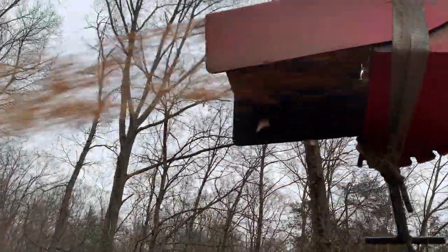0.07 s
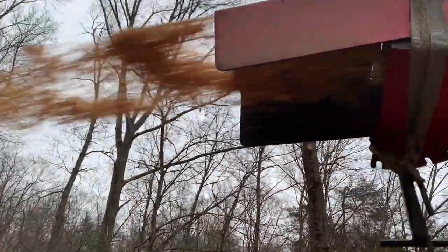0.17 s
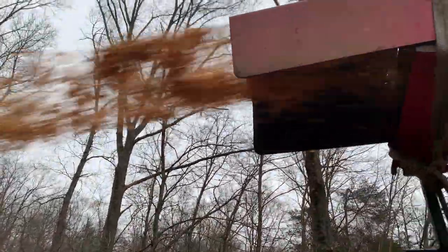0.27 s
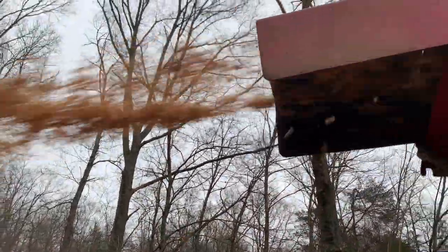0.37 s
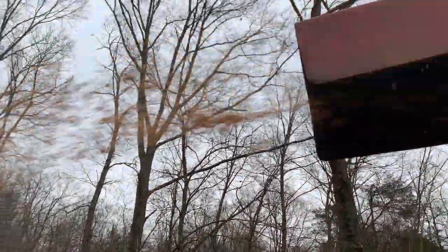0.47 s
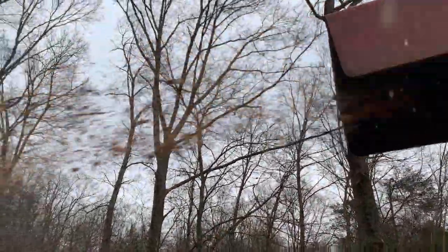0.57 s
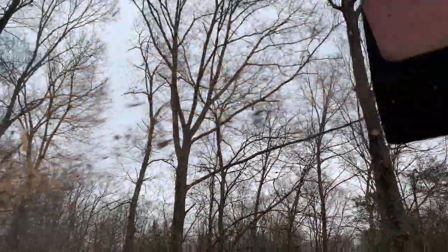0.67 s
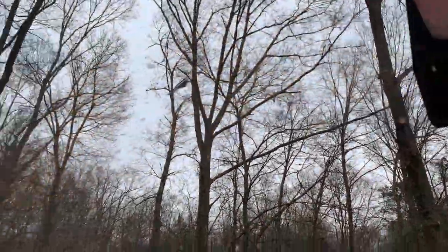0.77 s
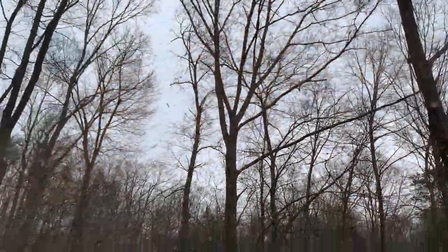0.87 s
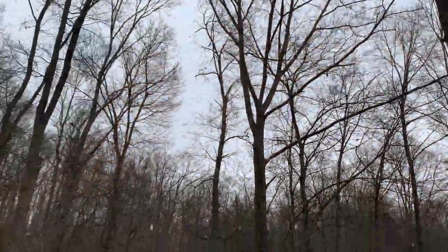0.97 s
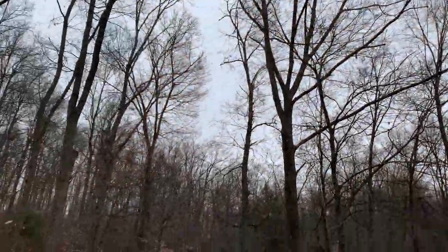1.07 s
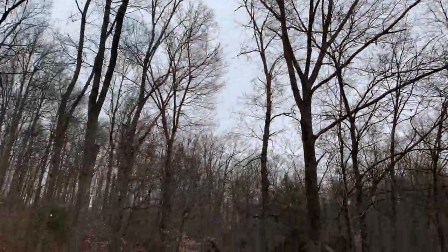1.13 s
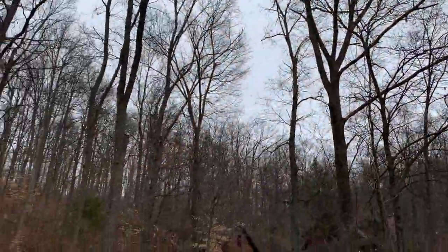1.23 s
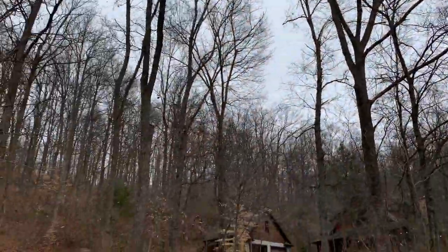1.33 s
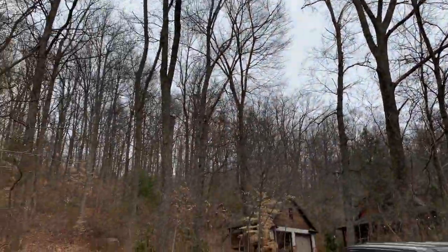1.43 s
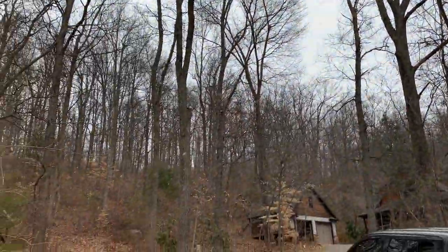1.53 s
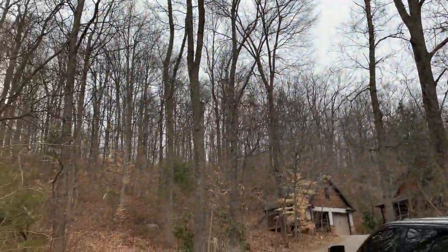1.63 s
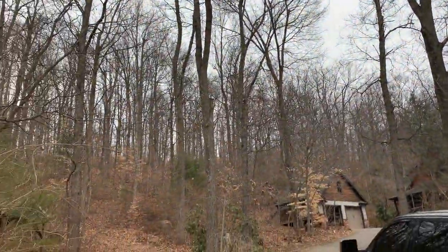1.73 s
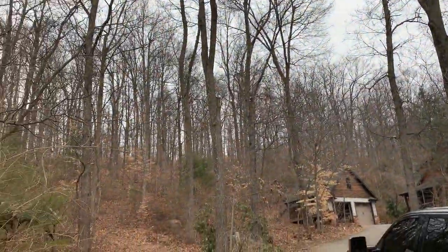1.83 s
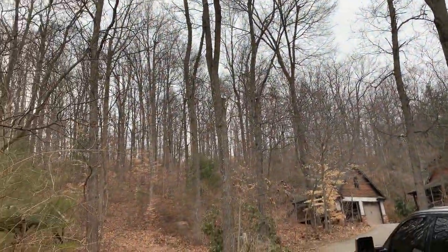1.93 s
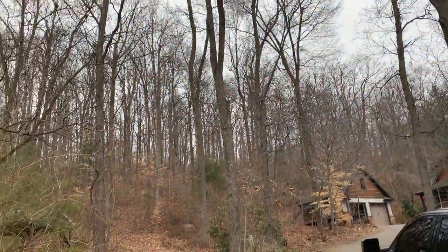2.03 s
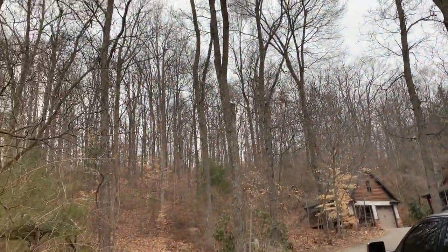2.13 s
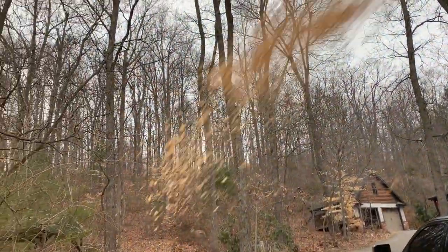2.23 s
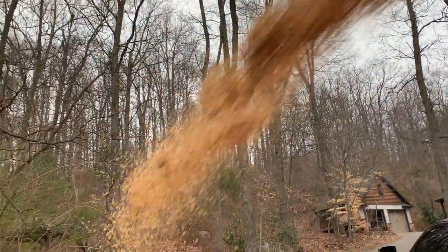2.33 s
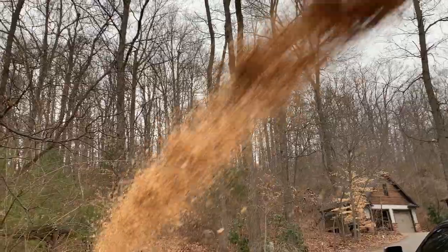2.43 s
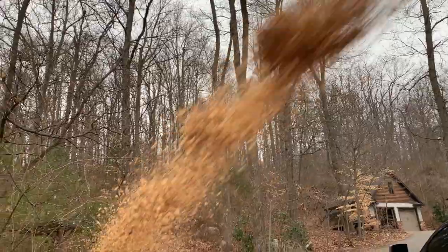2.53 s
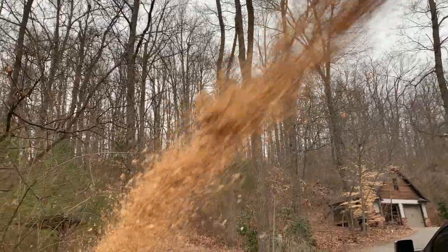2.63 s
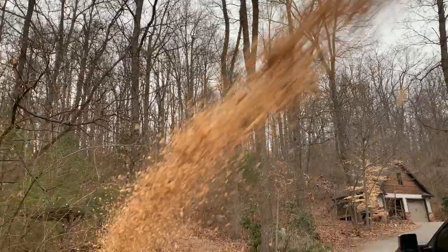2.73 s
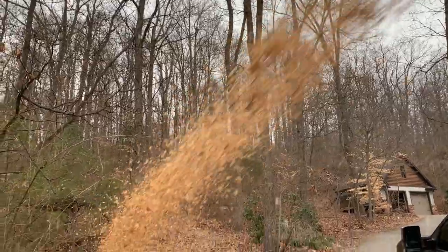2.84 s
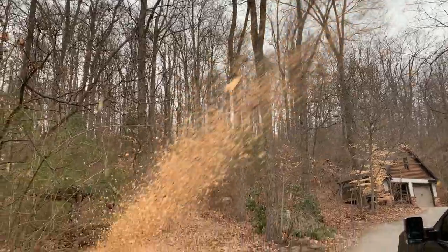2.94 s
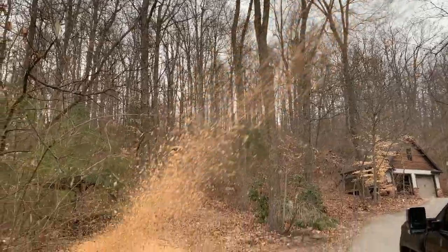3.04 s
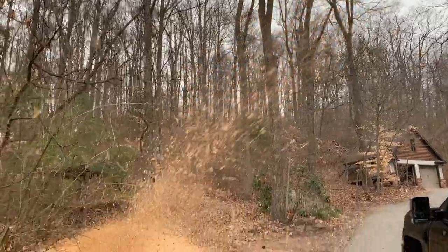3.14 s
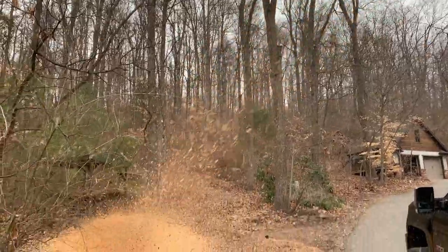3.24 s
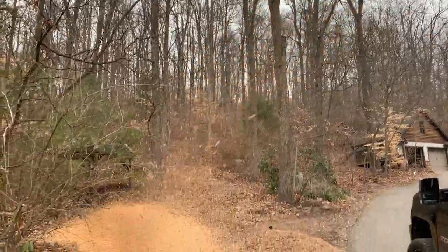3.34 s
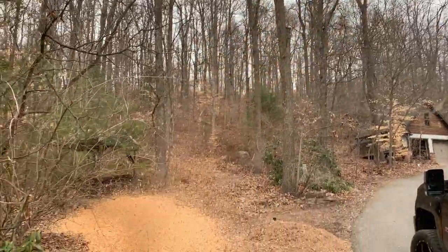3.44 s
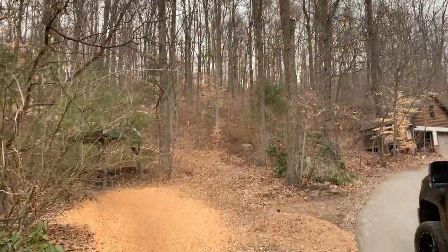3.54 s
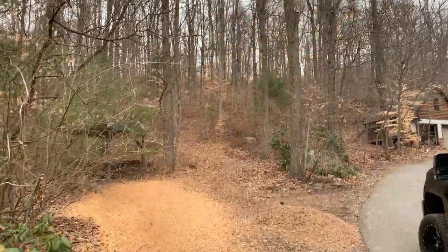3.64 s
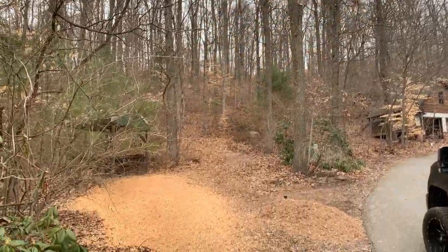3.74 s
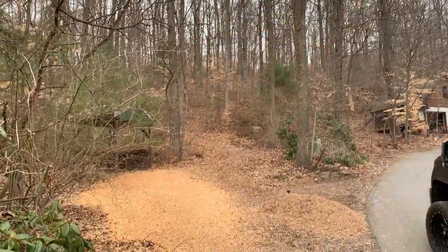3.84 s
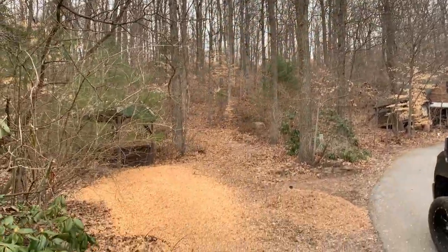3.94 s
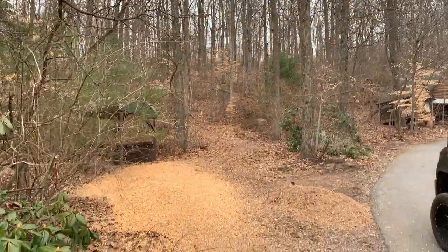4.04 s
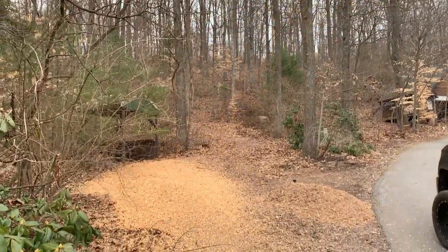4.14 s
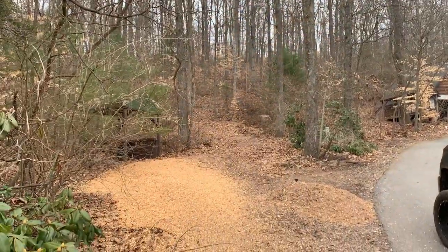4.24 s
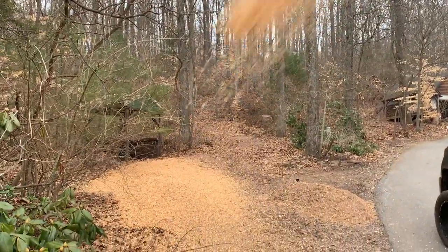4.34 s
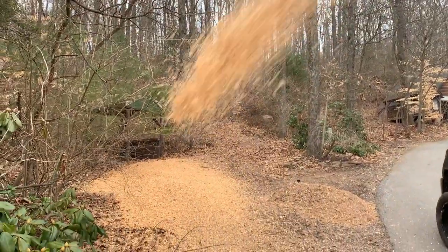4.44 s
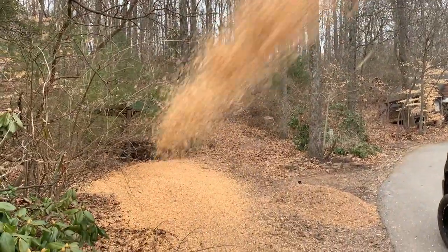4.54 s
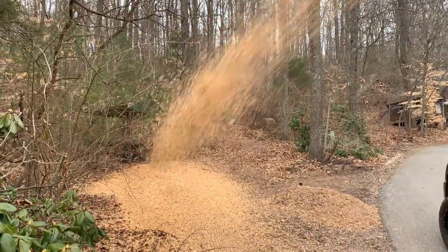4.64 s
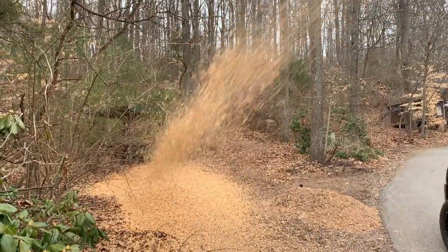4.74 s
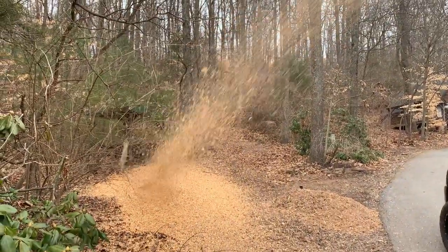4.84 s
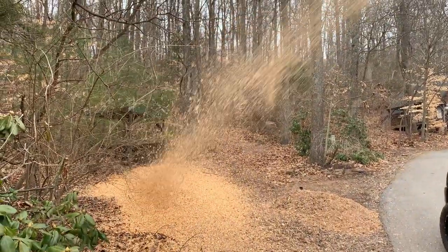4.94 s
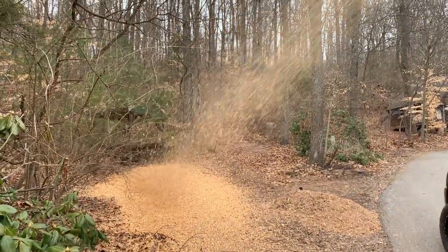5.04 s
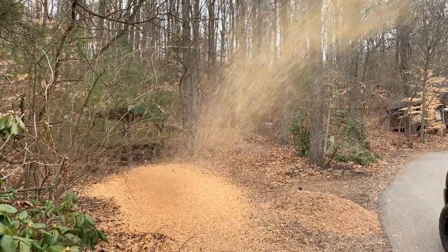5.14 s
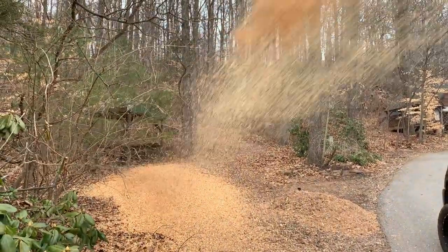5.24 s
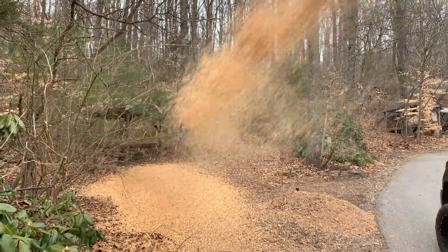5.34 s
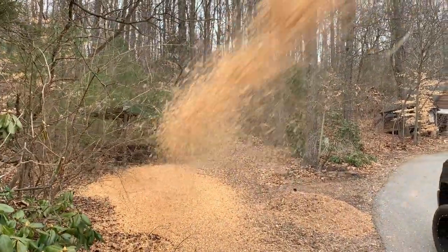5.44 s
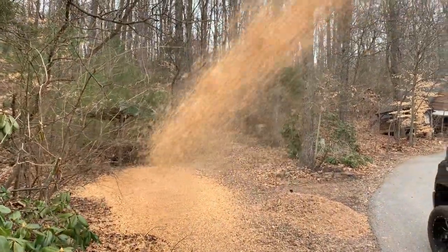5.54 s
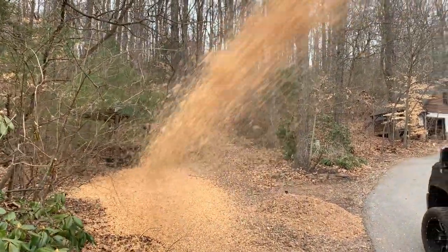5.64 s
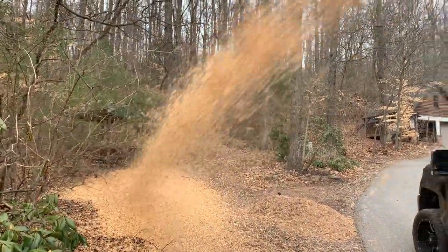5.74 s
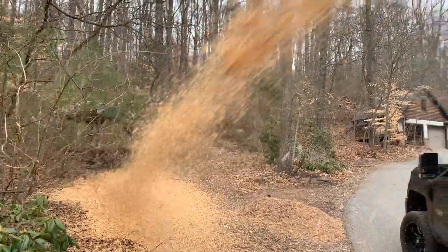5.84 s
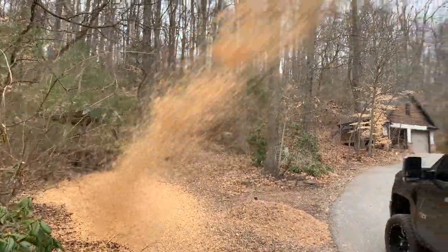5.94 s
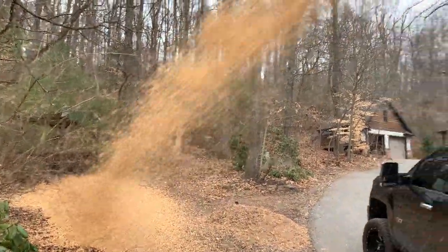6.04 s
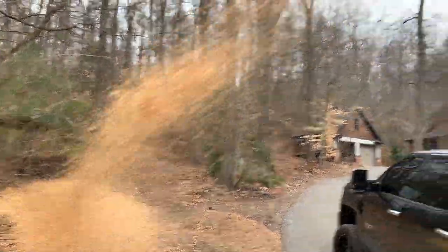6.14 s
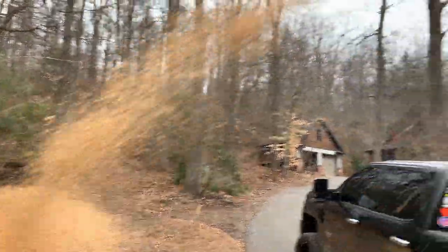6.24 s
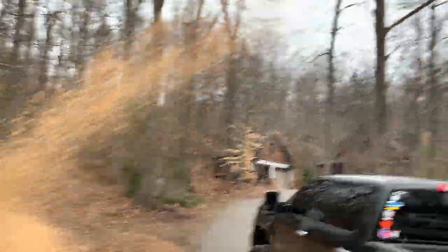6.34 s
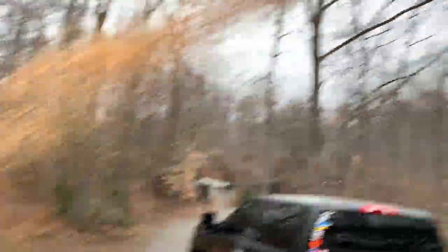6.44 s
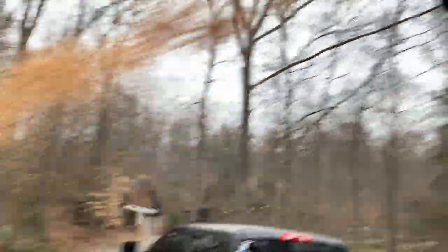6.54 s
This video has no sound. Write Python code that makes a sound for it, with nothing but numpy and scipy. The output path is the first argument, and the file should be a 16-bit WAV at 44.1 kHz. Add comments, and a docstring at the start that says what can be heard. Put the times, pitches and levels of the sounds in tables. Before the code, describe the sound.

A low diesel hum and a spinning knife drum beat against each other under a steady rush of cooling air. Wood chips rattle, thud and ring through a steel chute in bursts, with bright spray on top. Each feed makes the motor sag; pauses let it rise. The last feeds crowd together, roughest past the five-second mark. Close, open-air phone pickup.

```python
"""A towed wood chipper at a forest edge, its diesel exhaust and belt-driven knife drum humming a few hertz apart.
At 0 s chipping is under way: the chute roars, sprays and knocks; the hum sags, then climbs to 2 s as dust fades.
From 2.0 s a new surge pulls the speed down again; it recovers by 4.1 s, the two hums beating throughout.
Surges then follow closely, roaring near 5.3 s; the speed dips, recovers briefly to 5.06 s, then falls to the end.
Tones are summed sines, fan and chips shaped noise, knocks decaying sines; a phone hears it at two spaced ports."""
import sys
import numpy as np
from scipy import signal
from scipy.fft import rfft, irfft, next_fast_len
from scipy.io import wavfile
from scipy.ndimage import uniform_filter1d, map_coordinates

SR = 44100
rng = np.random.default_rng(int(sys.argv[2]) if len(sys.argv) > 2 else 0)


def wav_out(sig):
    """Save sig, one row per channel (or a flat mono array), as 16-bit PCM at SR to the path in sys.argv[1]."""
    wavfile.write(sys.argv[1], SR, np.round(np.clip(np.atleast_2d(sig).T, -1, 1) * 32767).astype(np.int16))


N = 291060


def amp(db):
    """Gain of a level in dB."""
    return 10 ** (np.asarray(db) / 20)


def unit(x):
    """x at rms 1."""
    return x / np.sqrt(np.mean(x ** 2) + 1e-20)


def along(points, hz):
    """Interpolate (Hz, value) points on a log frequency axis."""
    f, v = np.transpose(points)
    return np.interp(np.log(hz + 1), np.log(f + 1), v)


def curves(rows):
    """One value per sample for each column after the time."""
    s, *cols = np.transpose(rows)
    return [np.interp(np.arange(N) / SR, s, c) for c in cols]


def wobble(rate_hz):
    """Smooth random curve with rate_hz knots per second."""
    knots = rng.standard_normal(int(N * rate_hz / SR) + 4)
    return map_coordinates(knots, [np.arange(N) * rate_hz / SR])


def filtered(x, response):
    """x times a complex response of frequency."""
    m = next_fast_len(N + SR // 2)
    return irfft(rfft(x, m) * response(np.fft.rfftfreq(m, 1 / SR)), m)[..., :N]


# Steel chute resonances: (frequency [Hz], width [Hz], peak gain at resonant=1 [dB])
CHUTE_MODES = [(199.6, 43, 5.5), (317, 82, 3.5), (423, 35, 4.5), (486, 13, 2), (533, 48, 2), (630, 67, 2),
               (854, 27, 4), (993, 23, 2.5), (1376, 19, 7), (1670, 760, 4), (2080, 9.9, -8), (2690, 34, -3),
               (3440, 55, -2.5)]


def chute_db(hz):
    """Resonant gain of the chute: a sum of bell-shaped peaks in dB."""
    return sum(db / (1 + (2 * (hz - centre) / width) ** 2) for centre, width, db in CHUTE_MODES)


def rush(spectrum, patchy_db, resonant):
    """Two unrelated noises at rms 1 with shared time-frequency patches of gain; resonant scales the chute peaks."""
    z = signal.stft(rng.standard_normal((2, N)), nperseg=512)[2]
    field = rng.standard_normal(z.shape[1:])
    field = uniform_filter1d(uniform_filter1d(field, 6, 0), 8, 1)
    pair = signal.istft(z * amp(patchy_db * unit(field)), nperseg=512)[1][:, :N]
    return unit(filtered(pair, lambda hz: amp(along(spectrum, hz) + resonant * chute_db(hz))))


def grains(per_second, spread_db, life_s):
    """Rms-1 envelope of decaying impacts, dB sizes exponentially spread: upward, or downward if spread_db < 0."""
    draws = rng.random((round(per_second * N / SR), 2))
    sizes = amp(-spread_db * np.log(1 - draws[:, 1]))
    hits = np.bincount((draws[:, 0] * N).astype(int), sizes, N)
    # the second lap starts with the tails of the first
    laps = signal.lfilter([1], [1, -np.exp(-1 / (life_s * SR))], np.tile(hits, reps=2))
    return unit(laps[N:])


# Cooling air spectrum: (frequency [Hz], relative density [dB per Hz])
FAN_SPECTRUM = [(30, -28), (50, -19), (65, -6), (120, -8.5), (200, -3), (350, -8.5), (600, -10.5),
                (1000, -15), (2000, -21), (4000, -34), (8000, -40), (12400, -36), (13200, -50),
                (15700, -50)]


def cooling_fan():
    """Broadband rush of cooling air, slowly wavering, faintly coloured by the chute."""
    return amp(-35 + .8 * wobble(3)) * rush(FAN_SPECTRUM, patchy_db=1, resonant=.15)


# Fine dust drifting past the phone: (time [s], level [dB])
DUST_LEVEL = [(0, -55), (.4, -48), (.8, -47), (1.05, -47), (1.4, -52.5), (1.65, -63), (2.3, -78)]
# Ticks and puffs of spray close to the phone: (time [s], level before attack and noise [dB])
TICKS_AND_PUFFS = [(0.492, -29), (0.8494, -40), (0.9594, -45), (1.0794, -36), (1.1034, -33), (1.1398, -33),
                   (1.1644, -40), (1.3433, -40), (1.3694, -49), (1.6826, -37), (1.7644, -41), (2.8694, -35),
                   (3.0594, -41), (3.5294, -38), (3.5494, -39)]
# Spectrum of close dust, ticks and puffs: (frequency [Hz], relative density [dB per Hz])
PATTER_SPECTRUM = [(3000, -26), (5500, -8), (9000, -4), (12400, 0), (13200, -12), (15700, -13)]
TICK_T60_S, TICK_ATTACK_S = 0.065, .004


def dust_and_ticks():
    """Dust as dense impacts, ticks and puffs as single decays, all gating one treble noise."""
    ticks, t = np.zeros(N + SR), np.arange(SR // 3) / SR
    for s, db in TICKS_AND_PUFFS:
        ticks[round(s * SR):][:len(t)] += amp(db - 60 * t / TICK_T60_S) * (1 - np.exp(-t / TICK_ATTACK_S))
    dust = amp(curves(DUST_LEVEL)[0]) * grains(2500, spread_db=1.6, life_s=.006)
    return (ticks[:N] + dust) * rush(PATTER_SPECTRUM, patchy_db=2, resonant=0)


# Knocks and short chute rings, thickening into a roar near 5.3 s:
# (time [s], level before attack and roughness [dB], frequency [Hz], t60 [s])
KNOCKS_AND_RINGS = [(0.025, -13, 202, .15), (0.19, -14.5, 450.4, .25), (0.25, -10, 466, 0.16),
                    (2.142, -12, 490, 0.42), (2.212, -7.5, 288, 0.12), (2.31, -11, 196, 0.1),
                    (2.432, -10, 460, 0.091), (2.533, -9.5, 193, 0.14), (2.618, -19, 307, .08),
                    (4.152, -6.5, 293, 0.084), (4.19, -12, 429, 0.28), (4.425, -10, 295, 0.11),
                    (5.12, -5, 428, 0.063), (5.187, -9, 194, 0.11), (5.245, -8, 587, .12),
                    (5.275, -3.5, 427, 0.079), (5.3, -11, 658, 0.19), (5.345, -11, 513, 0.13),
                    (5.43, -3, 438, 0.076), (5.445, -8, 598, 0.089), (5.744, -13, 436, 0.12),
                    (5.823, -14, 198, 0.085), (6.228, -11.5, 193, 0.08), (6.295, -4.5, 203, 0.07),
                    (6.432, -6, 408, 0.12), (6.5, -16.5, 425, 0.36)]
KNOCK_ATTACK_S, KNOCK_ROUGH_DB = 0.0091, 3


def chute_knocks():
    """Knocks and short chute rings as decaying sines, unevenly damped by the chip stream."""
    knocks, t = np.zeros(N + SR), np.arange(SR // 3) / SR
    for s, db, hz, t60_s in KNOCKS_AND_RINGS:
        envelope = amp(db - 60 * t / t60_s) * (1 - np.exp(-t / KNOCK_ATTACK_S))
        knocks[round(s * SR):][:len(t)] += envelope * np.sin(2 * np.pi * hz * t)
    return amp(KNOCK_ROUGH_DB * wobble(45)) * knocks[:N]


# Exhaust tones: (multiple of firing rate [-], relative level [dB])
EXHAUST_TONES = [(1, 0), (1.5, -19), (2, 0), (2.5, -10), (3, 0), (3.5, -15), (4, -6), (4.5, -15), (5, -8.5),
                 (5.5, -20), (6, -8), (6.5, -19), (7, -12), (8, -12), (8.5, -19), (9, -23), (9.5, -20),
                 (10, -15)]
UNEVEN_FREE_DB, UNEVEN_LOADED_DB = -2, 10.5  # added to the halfway tones


def exhaust(firing, load, upper_db):
    """Firing-rate harmonics plus halfway tones from unequal cylinders; high or loaded tones flutter more."""
    uneven_db = UNEVEN_FREE_DB + (UNEVEN_LOADED_DB - UNEVEN_FREE_DB) * load
    tones = 0
    for k, db in EXHAUST_TONES:
        level_db = db + (k % 1 > 0) * uneven_db + (k > 3) * upper_db
        flutter_db = (.12 * k + .08 * uneven_db) * wobble(6)
        # high tones leave the pipe later; above the fourth, an extra half-turn lag per multiple
        lag_rad = .14 * k * (k - 1) + np.pi * max(k - 4, 0)
        tones = tones + amp(level_db + flutter_db) * np.sin(2 * np.pi * k * firing - lag_rad)
    return tones


# Drum tones: (multiple of drum pulse rate [-], relative level [dB], phase offset [turns])
DRUM_TONES = [(1, -0.5, 0), (2, -3, 0.084), (3, -29, 0.021), (4, -14, 0.11), (5, -15, 0.00013)]


def knife_drum(turning):
    """Drum harmonics in opposite sign, so the fundamental opposes the exhaust's at whole turns gained."""
    return sum(-amp(db) * np.sin(2 * np.pi * (k * turning + offset)) for k, db, offset in DRUM_TONES)


# Firing rate: (time [s], rate before jitter [Hz])
FIRING_RATE = [(0, 67), (.37, 61), (.5, 61.8), (.85, 65.5), (1.2, 68.3), (1.6, 70.8), (2.08, 73.1),
               (2.3, 66), (2.6, 58.5), (2.75, 57.3), (3.1, 59.6), (4.05, 68), (4.13, 68.4), (4.3, 63.5),
               (4.5, 60.3), (5.06, 63.5), (5.55, 51), (5.8, 47.8), (6.6, 44.5)]
# Drum phase gained on the firing phase: (time [s], gain [turns])
DRUM_GAINED = [(0, -1.15), (1.742, 7), (2.115, 9), (2.29, 10), (2.49, 11), (2.768, 12), (3.275, 14),
               (4.133, 18), (4.6, 20), (5.218, 23), (6.6, 29)]
# Running free: (time [s], engine level [dB], drum level [dB], lift of exhaust tones above the third [dB])
FREE_RUNNING = [(0, -29, -32, 0), (.45, -34, -31.5, 0), (.85, -32, -32.5, 1), (1.2, -30, -36.5, 2),
                (1.7, -29.5, -34, 3), (2.1, -27, -32, 0), (2.22, -24, -33, -4), (2.3, -34, -33, 0),
                (2.75, -34, -31.5, 0), (3.3, -32.5, -31, 2), (3.7, -30.5, -33, 2.5), (3.9, -29.5, -33.5, 4),
                (4.1, -28.5, -34.5, 2), (4.5, -32.5, -30, 0), (5.06, -35, -29.5, 0), (5.6, -32, -40, 0),
                (6.6, -32, -42, 0)]
# Colour of both hums: (frequency [Hz], gain [dB])
HOUSING_COLOUR = [(30, -20), (45, -5), (60, -2), (69, 1), (73, 8), (77, 1), (100, -2), (134, 3), (147, 1),
                  (155, -5), (178, 4), (195, 2), (218, -4), (270, 2.5), (295, -1), (322, -3), (336, 6),
                  (345, -2), (365, -4), (405, 2), (432, -6), (460, -7), (505, 5), (530, -4), (575, 6),
                  (605, -2), (640, -2), (668, 2), (700, 6.5), (900, 0)]
ENGINE_LOADED_DB, DRUM_LOADED_DB = -3, -0.5  # level changes at full load
FULL_LOAD_DB, LOAD_RANGE_DB = -18.5, 27.5  # rattle at full load; span down to no load


def hum(rattle_gain):
    """Exhaust and drum beat together, load shifting their levels; also returns the drum phase [turns]."""
    load = np.clip(1 + (20 * np.log10(rattle_gain) - FULL_LOAD_DB) / LOAD_RANGE_DB, 0, 1)
    load = uniform_filter1d(load, size=SR // 8)
    engine_db, drum_db, upper_db = curves(FREE_RUNNING)
    firing = np.cumsum(curves(FIRING_RATE)[0] * (1 + .001 * wobble(12))) / SR
    turning = firing + curves(DRUM_GAINED)[0]
    tones = amp(engine_db + ENGINE_LOADED_DB * load) * exhaust(firing, load, upper_db)
    tones = tones + amp(drum_db + DRUM_LOADED_DB * load) * knife_drum(turning)
    return filtered(tones, lambda hz: amp(along(HOUSING_COLOUR, hz))), turning


# Leftover chips between surges: (time [s], rattle [dB], thuds over rattle [dB], spray [dB])
LEFTOVERS = [(0, -40, 6, -38.5), (.4, -40.5, 11.5, -39), (.75, -48, 7, -43), (1.4, -48, 10, -58),
             (2.05, -45.5, 11.5, -61), (2.75, -41, 5, -44.5), (3.45, -41.5, 4.5, -51.5),
             (4.1, -39.5, 9, -54.5), (4.6, -33.5, 4.5, -42.5), (6.6, -50, 11, -39)]
# Surges of chipping; several may make up one feed: (start [s], length [s], rattle [dB],
# change by the end [dB], thuds over rattle [dB], spray before spurt [dB])
SURGES = [(-.15, 0.41, -24.5, -1.5, 5.5, -27.5), (2.034, 0.56, -22, 0, 3, -29.5),
          (2.6, .08, -30, -2, 4, -40), (4.074, 0.38, -20.5, -3, 2.5, -31),
          (4.577, 0.059, -29.5, 3, 5.5, -46), (4.72, 0.1, -26.5, -1.9, 5.5, -37.5),
          (4.95, 0.23, -23.5, 4.5, 4, -36), (5.112, 0.18, -21.5, 1.5, 6.5, -33),
          (5.246, 0.43, -19.5, -7, 5, -33), (5.63, 0.32, -26.5, -0.5, 5, -40.5),
          (5.932, 0.37, -32.5, 5.5, 6, -41.5), (6.297, 0.085, -31, 1, 4, -41),
          (6.351, 0.07, -30.5, 3.5, 9.5, -37.5), (6.428, 0.088, -35.5, 0, 9, -34.5)]
ATTACK_S, ATTACK_CURVE = 0.042, 2.85
RELEASE_DB_PER_S, SPRAY_RELEASE_DB_PER_S = 86, 58
BOOM_LINGERS_DB_PER_S = 25  # taken off the thuds' release
CHANGE_CURVE, SPRAY_FOLLOWS = 1.3, 0.85  # above 1 the change comes late; share of it taken by the spray
SPURT_DB, SPURT_S = 6, 0.072
LAST_CHIPS_DB, LAST_CHIPS_S = 1.2, .06  # clumps in the dying rattle; their fade-in


def chipping_gains():
    """Gains of rattle, thuds and spray: each surge swells, drifts and dies away over the leftover chips."""
    rattle_db, over_idle_db, spray_db = curves(LEFTOVERS)
    gains = amp([rattle_db, rattle_db + over_idle_db, spray_db])
    clumps_db = LAST_CHIPS_DB * wobble(28)
    for s, length, db, change_db, over_db, fly_db in SURGES:
        t = np.maximum(np.arange(N) / SR - s, 0)
        after = np.maximum(t - length, 0)
        drift_db = change_db * np.minimum(t / length, 1) ** CHANGE_CURVE
        roar_db = db + drift_db - RELEASE_DB_PER_S * after + clumps_db * np.minimum(after / LAST_CHIPS_S, 1)
        boom_db = roar_db + over_db + BOOM_LINGERS_DB_PER_S * after
        flying_db = fly_db + SPRAY_FOLLOWS * drift_db + SPURT_DB * np.exp(-t / SPURT_S)
        flying_db = flying_db - SPRAY_RELEASE_DB_PER_S * after
        swell = (1 - np.exp(-t / ATTACK_S)) ** ATTACK_CURVE
        gains = np.maximum(gains, swell * amp([roar_db, boom_db, flying_db]))
    return gains


# Spectra: (frequency [Hz], relative density [dB per Hz])
THUD_SPECTRUM = [(35, -23), (90, -4.5), (200, -2.5), (500, -3.5), (800, -8.5), (1300, -16.5), (3000, -51)]
RATTLE_SPECTRUM = [(300, -14), (700, 0), (1100, -3.5), (2000, -4.5), (3500, -4), (4500, -10), (7000, -21),
                   (12000, -43)]
SPRAY_SPECTRUM = [(2000, -22), (4000, -3), (6000, 1), (8000, -3.5), (10500, -2.5), (12400, -2.5),
                  (13200, -16), (15700, -15)]


def chipping(gains, turning):
    """Knives bite once a drum pulse as thuds; chips rattle up the chute and fly out as spray, wavering together."""
    rattle_gain, thud_gain, spray_gain = gains
    bite = 1 + 0.048 * np.cos(2 * np.pi * turning)
    waver = wobble(18)
    thud = thud_gain * amp(.6 * waver) * bite * rush(THUD_SPECTRUM, patchy_db=1.1, resonant=1.2)
    rattle = rattle_gain * amp(0.32 * waver) * grains(4000, spread_db=1.5, life_s=.004)
    rattle = rattle * rush(RATTLE_SPECTRUM, patchy_db=1.2, resonant=1.0)
    spray = spray_gain * amp(.8 * waver) * grains(3600, spread_db=-0.5, life_s=0.0078)
    spray = spray * rush(SPRAY_SPECTRUM, patchy_db=1.5, resonant=0)
    return thud + rattle + spray


# Likeness of the ports for equal direct and scattered sound: (frequency [Hz], correlation [-])
PORT_LIKENESS = [(60, 1), (150, .98), (300, 0.9), (600, 0.72), (1100, 0.75), (1800, 0.6), (2500, 0.35),
                 (3300, 0.45), (4700, 0.8), (7000, .85), (15000, 0.8)]
# Phase lead of the left port: (frequency [Hz], lead [rad])
LEFT_LEAD = [(0, 0), (200, -.2), (400, -.75), (800, -1.35), (1900, -.6), (4700, 3.14), (15500, 18.74)]
# Left over right: (frequency [Hz], level [dB])
LEFT_OVER_RIGHT = [(60, 0.8), (150, 2.5), (400, 2.5), (700, -.5), (1800, 1), (4000, 0.2), (8000, 0)]


def ports(pair):
    """Direct (row 0) and scattered (row 1) sound mix into two ports that differ in phase and level."""
    turn = lambda hz: np.arccos(np.clip(along(PORT_LIKENESS, hz), -1, 1)) / 2
    direct, scattered = filtered(pair, lambda hz: np.array([np.cos(turn(hz)), np.sin(turn(hz))]))
    left_right = np.array([direct + scattered, direct - scattered])

    def half(hz):
        """Half the port difference; the right port takes its inverse."""
        return np.exp(.5j * np.interp(hz, *np.transpose(LEFT_LEAD))) * amp(along(LEFT_OVER_RIGHT, hz) / 2)

    return filtered(left_right, lambda hz: np.array([half(hz), 1 / half(hz)]))


def scene():
    """Fan, dust, knocks, hum and chipping at the two ports; hum and knocks are direct sound only."""
    gains = chipping_gains()
    tones, turning = hum(gains[0])
    direct_only = (tones + chute_knocks()) * [[1], [0]]
    return ports(cooling_fan() + dust_and_ticks() + direct_only + chipping(gains, turning))


TOP_HZ = 15800


def record(dry):
    """The phone rounds off the loudest peaks and keeps nothing from TOP_HZ up."""
    rounded = dry / (1 + np.abs(dry / .85) ** 4) ** (1 / 4)
    return filtered(rounded, lambda hz: hz < TOP_HZ)


dry = scene()
out = record(dry)
wav_out(out)
```